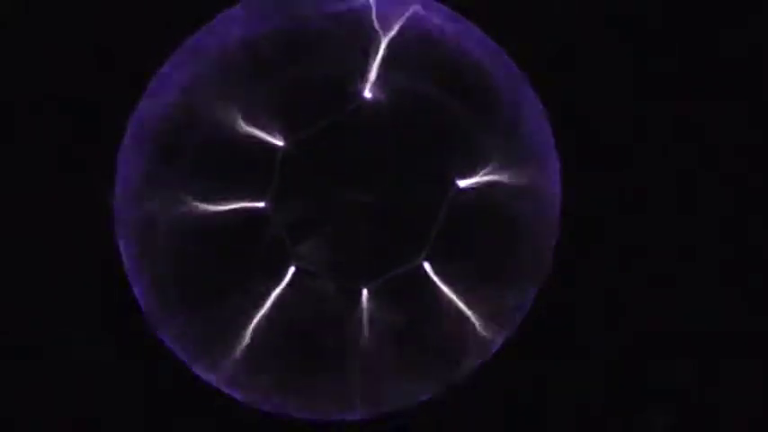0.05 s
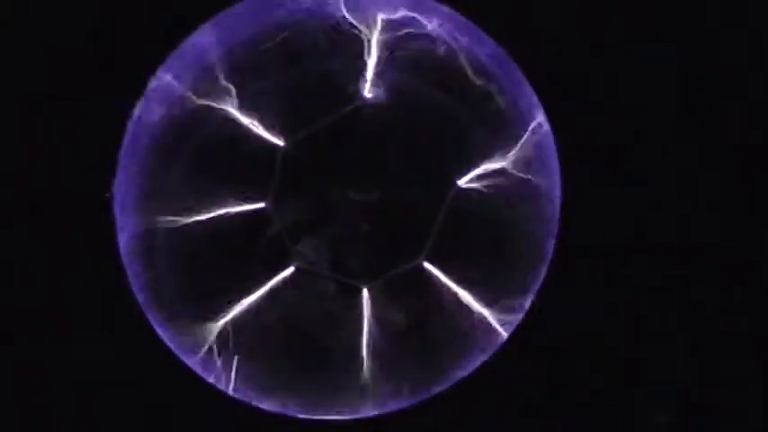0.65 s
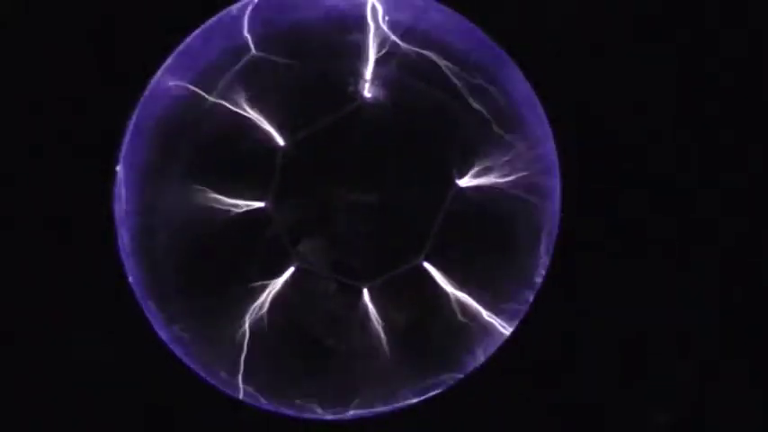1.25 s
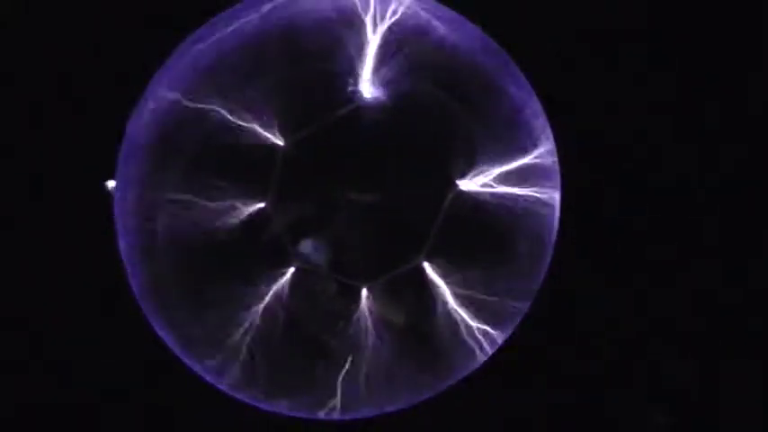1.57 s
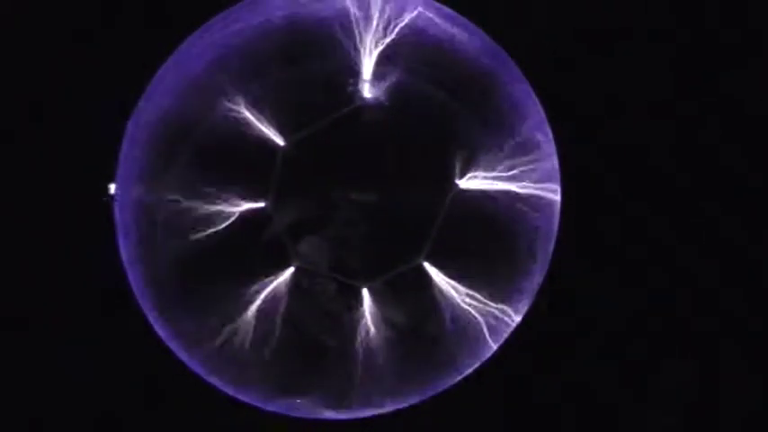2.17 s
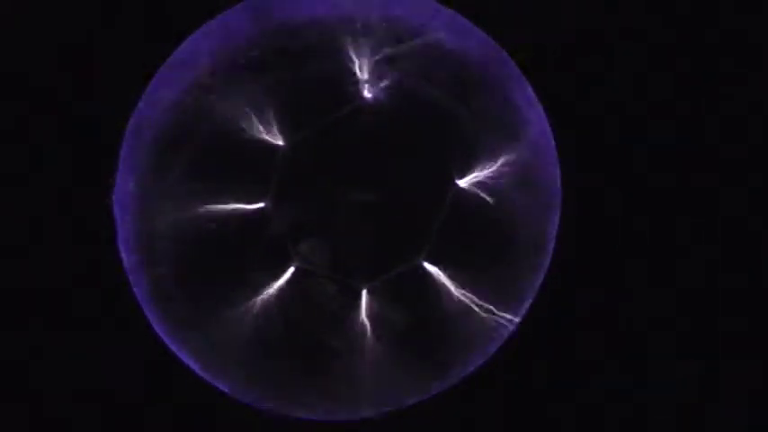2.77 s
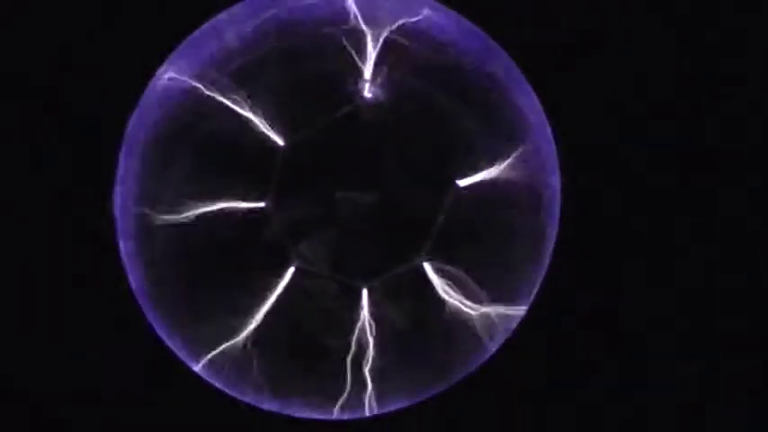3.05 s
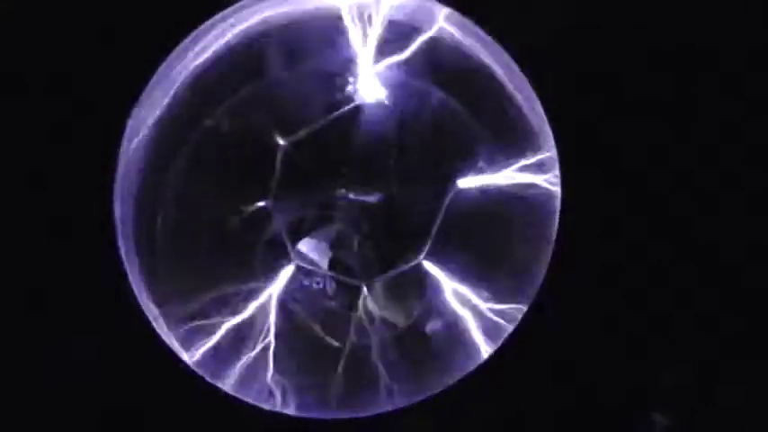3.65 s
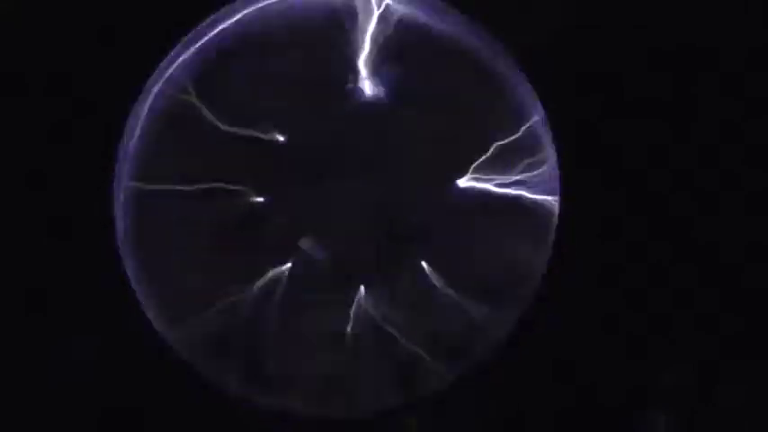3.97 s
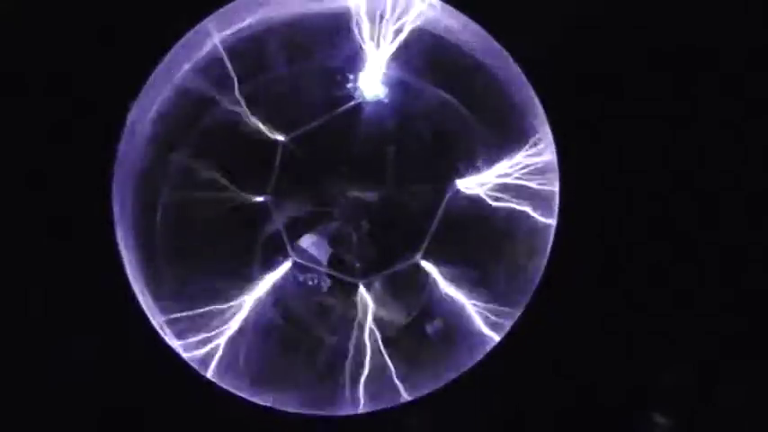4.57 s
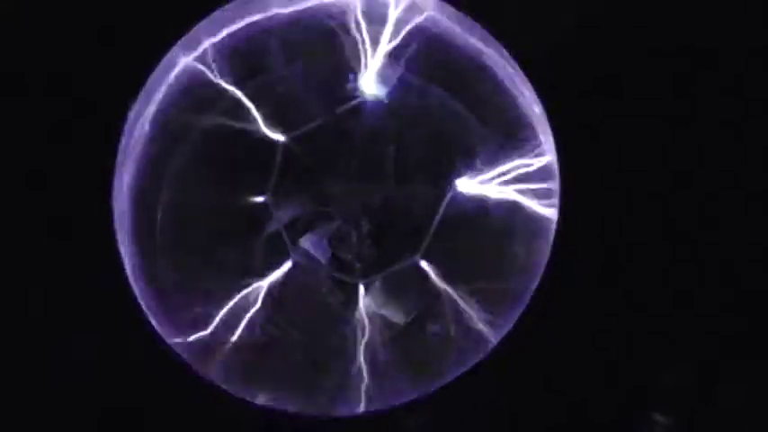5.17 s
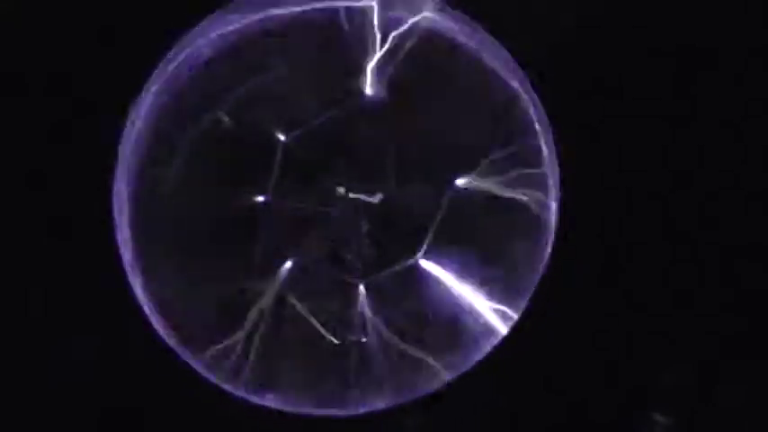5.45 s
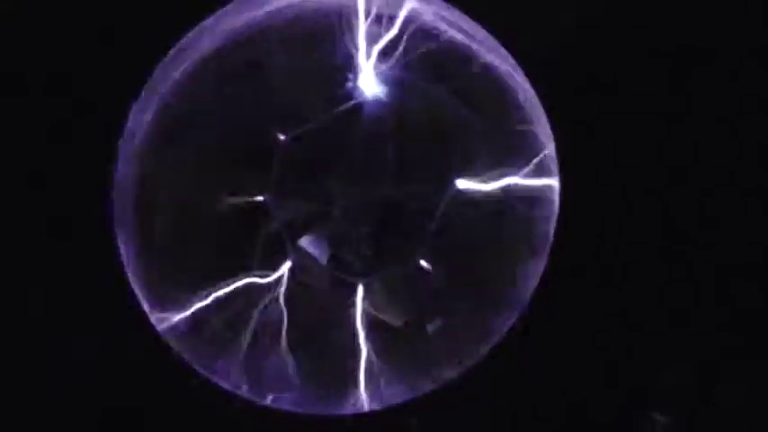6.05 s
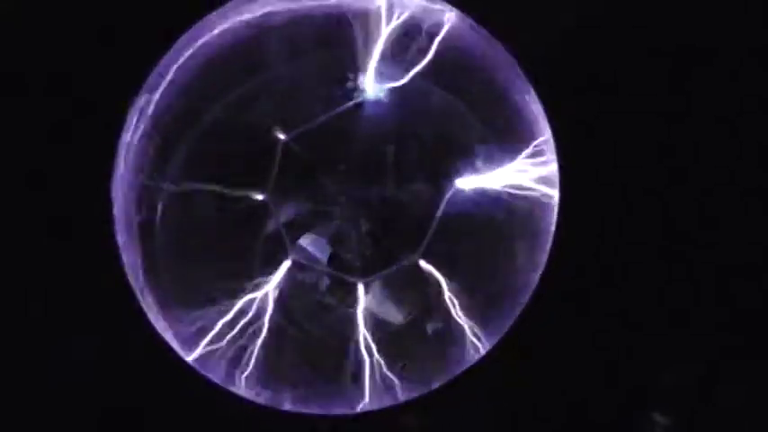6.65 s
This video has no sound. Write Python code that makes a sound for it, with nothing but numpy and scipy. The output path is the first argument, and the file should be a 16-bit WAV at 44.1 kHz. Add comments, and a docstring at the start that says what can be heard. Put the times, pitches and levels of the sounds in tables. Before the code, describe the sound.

Dense, buzzing crackle of high-voltage sparks inside a glass light bulb, with bright sizzling and irregular sharper snaps.

```python
"""High-voltage sparks in a light bulb

Once per mains cycle the gas breaks down in a volley of snaps; heavy arcs also thud on the glass.
Ordinary sparks vary with the charge left for them. Tiny discharges sizzle after each.
Halfway through, the arcs grow hot at one support wire and the bulb's ringing swells.
Behind it: the echoes of a small workroom, transformer hum, quiet air."""
import sys
import numpy as np
from scipy import signal
from scipy.fft import rfft, irfft, next_fast_len
from scipy.io import wavfile
from scipy.ndimage import uniform_filter1d

SR = 44100
rng = np.random.default_rng(int(sys.argv[2]) if len(sys.argv) > 2 else 0)


def bounce(signal):
    """Save signal as a 16-bit WAV file at the path given by the first command-line argument."""
    frames = np.transpose(np.atleast_2d(signal))
    limited = np.clip(frames, -1, 1)
    pcm = np.round(limited * 32767).astype(np.int16)
    wavfile.write(sys.argv[1], SR, pcm)


N = 299875
MAINS_HZ, FIRST_CREST_S = 49.94, 0.0154

# Heavy arcs. Each row: start in seconds, then crack, thud and sizzle in relative dB.
HEAVY_ARCS = [(0.0355, -17.5, -28.5, -37), (0.1562, -18.5, -36, -30), (0.195, -18.0, -36.5, -26.5),
              (0.236, -19, -39, -40), (0.336, -16.5, -41, -29), (0.3956, -21.5, -38.5, -34),
              (0.4753, -16, -32.5, -35), (0.5173, -19.5, -34, -37), (0.6571, -19, -38.5, -35),
              (0.677, -19, -42, -32), (0.7352, -20.5, -36, -30.5), (0.7556, -18.5, -42.5, -35),
              (0.9167, -17.0, -37.5, -32), (1.0167, -19, -70, -28.5), (1.0766, -19.5, -50, -34),
              (1.0966, -20.0, -33, -41), (1.157, -21.5, -38.5, -35), (1.1972, -18.5, -35.5, -33),
              (1.3176, -18, -35.5, -29), (1.3572, -21, -42, -30.5), (1.3985, -22.5, -40, -34),
              (1.418, -21, -30.5, -52), (1.5574, -20, -37.5, -31), (1.5975, -19, -40, -36),
              (1.678, -18.5, -40.5, -26.5), (1.7176, -15.5, -34.5, -39), (1.8184, -18.5, -42, -32),
              (1.858, -17.5, -39, -34), (1.9779, -19, -34.5, -46), (2.1168, -18.5, -43.5, -29),
              (2.1389, -21.0, -40.5, -30), (2.2199, -18.5, -41, -35), (2.2388, -20, -42.5, -39),
              (2.3, -23, -42, -43), (2.3798, -21, -44, -41), (2.4774, -17.5, -39, -32),
              (2.4984, -20.5, -38.5, -39), (2.6196, -20.0, -36, -38), (2.6585, -19.5, -41, -32),
              (2.718, -21.5, -46, -34), (2.7789, -18.5, -35, -36), (2.8589, -19, -40, -33),
              (2.8982, -20.0, -37, -31), (2.9599, -19.5, -40.5, -31), (3.0191, -22, -40.5, -38),
              (3.0589, -22, -41.5, -34.5), (3.1796, -19, -31, -39), (3.3395, -19.5, -36, -32),
              (3.5183, -18.5, -38, -34), (3.539, -19.5, -36, -42), (3.6403, -18.5, -43.5, -32.5),
              (3.6992, -22.5, -52, -27.5), (3.74, -20.5, -38, -51), (3.7998, -19.5, -40.5, -34),
              (3.8415, -17, -36.5, -29), (3.9, -20.5, -43.5, -35), (3.9196, -19, -36.5, -37),
              (3.96, -19.0, -39.5, -33), (4, -22.5, -45, -37), (4.059, -23, -56, -32),
              (4.0798, -21, -40.5, -38), (4.121, -16.5, -39, -30.5), (4.1602, -21, -33.5, -35),
              (4.2205, -18.5, -32.5, -40), (4.2607, -17.5, -43, -35), (4.361, -19.5, -42, -35),
              (4.4401, -18.5, -29.5, -36), (4.5405, -20, -42.5, -37), (4.5803, -16.5, -35, -43),
              (4.7222, -19.5, -38.5, -36), (4.7812, -17.0, -43, -29.5), (4.9802, -19.5, -36, -39),
              (5.0612, -15.5, -39, -36), (5.0802, -20.0, -34.5, -42), (5.141, -19.5, -46, -39),
              (5.1814, -18.5, -38, -36.5), (5.3016, -18, -39, -35), (5.343, -20.5, -38.5, -34.5),
              (5.461, -20.5, -34.5, -34), (5.5614, -19.5, -32.5, -32), (5.6426, -22.0, -38, -49),
              (5.6622, -18.0, -38, -31), (5.7204, -20.0, -31.5, -34), (5.8428, -18.5, -38.5, -35),
              (5.9015, -20.5, -38.5, -32.5), (5.9809, -19, -36.5, -38), (6.0409, -21, -39, -36),
              (6.1205, -18.5, -31, -29.5), (6.143, -17.5, -33.5, -34.5), (6.203, -18, -39, -32),
              (6.2603, -19, -37.5, -31.5), (6.3424, -19, -34.5, -34), (6.4622, -20.5, -33, -31),
              (6.4823, -22.5, -39, -40), (6.5404, -23.5, -50, -30), (6.562, -19.5, -39.5, -39),
              (6.6439, -18.5, -38.5, -36), (6.7043, -18.5, -37, -40), (6.7449, -19.5, -38, -29)]
# Crests where the gas barely breaks down. Each entry: time in seconds.
LULLS_S = [0.12, 0.44, 1.58, 1.84, 2.1, 2.46, 2.7, 2.76, 3.16, 3.26, 3.38, 3.5, 3.62, 4.04, 4.1, 4.24, 4.86,
           5.24, 5.5, 5.62, 6.02, 6.1, 6.3]
# Charge for ordinary sparks. Each row: time in seconds, offset in dB.
CHARGE_DB = [(0, -2), (.7, 0), (1.65, -2.5), (2.05, 3.5), (2.55, 0), (3, -1), (3.3, -0.5), (3.8, -0.7),
             (4.6, -0.9), (5.7, 0.8), (6.3, 1), (6.8, -3.5)]
# Arc heat at the support wire. Each row: time in seconds, heat from 0 to 1.
ARC_HEAT = [(0, 0.33), (2.95, 0.09), (3.3, 0.43), (3.55, 0.82), (5, 1), (6.8, 0.9)]
# Source spectra. Each row: frequency in Hz, relative density in dB.
CRACK_SPECTRUM = [(1200, -51), (2400, -23), (3300, -17), (4500, -10), (5800, -12.5), (7600, -9.5),
                  (9000, -3.5), (10100, -1.5), (11600, 3), (13000, 0.5), (14200, -3), (15600, -6),
                  (16100, -13)]
KNOCK_SPECTRUM = [(100, -33), (500, -5.5), (950, -1.5), (1400, 1.5), (2000, -2.5), (2400, -10), (4000, -29)]
THUD_SPECTRUM = [(15, 4), (50, 0), (150, -0.5), (400, 0.5), (800, 1), (1200, -2.5), (1700, -12),
                 (2100, -11.5), (2450, -26.5), (4000, -56)]
SIZZLE_SPECTRUM = [(60, -14.5), (400, -9), (1000, -10.5), (1900, -5), (2450, -17), (3300, -11),
                   (4600, -4.5), (7500, -5), (9000, -2.5), (11600, -1.5), (13500, 4), (15600, -5),
                   (16100, -12)]
AIR_SPECTRUM = [(20, -17), (60, -19), (150, -12), (400, 6.5), (1500, -1), (5000, -0.5), (15000, -52)]
# Broad resonances of the glass. Each row: centre in Hz, width in Hz, lift in dB.
GLASS_RESONANCES = [(4900, 270, 0.5), (6400, 360, 2.5), (8240, 65, 7), (9110, 530, 6.5), (9220, 96, -12),
                    (11070, 300, 2), (13000, 930, -1), (12800, 350, 0.5), (15300, 340, -0.5),
                    (15760, 690, 7.5)]
# Sharp modes of bulb and wires. Each row: frequency in Hz, gain in dB at full heat.
BULB_MODES = [(1513, -66), (2056, -60.5), (3268, -58.5), (4673, -66), (6196, -65), (6616, -52), (7671, -53),
              (9025, -54), (9249, -54), (9609, -53), (10494, -44), (10799, -44), (11795, -47),
              (12096, -42.5), (13135, -52), (13291, -52), (13657, -51), (14314, -59), (15176, -54),
              (15628, -45)]
# Stereo balance of direct sound. Each row: frequency in Hz, left over right in dB.
BALANCE_DB = [(100, 1), (5000, -0.5), (7600, 0.3), (9500, -2.6), (11400, -4.6), (12300, -6.5), (13300, 11),
              (14800, -8), (16000, 6)]
# Stereo phase of direct sound. Each row: frequency in Hz, left lead in radians.
LEFT_LEAD_RAD = [(100, -0.13), (7500, -0.25), (8500, -0.9), (10200, 0.14), (12000, 0.65), (13300, 1),
                 (14600, 0.046), (16000, 0.19)]
# Stereo width of sizzle, reverb and room air: wide in the bass and top treble, centred in the mids.
# Each row: frequency in Hz, left-right coherence from 0 to 1.
STEREO_COHERENCE = [(50, 0.53), (250, 0.56), (600, 0.88), (1200, 0.91), (2400, 1), (5000, 0.98),
                    (9000, 0.82), (14000, 0.35)]
# Echoes off nearby surfaces. Each row: delay in seconds, gain in dB.
SLAP_ECHOES = [(.0072, -21.5), (0.0124, -18.5)]
# Room decay. Each row: frequency in Hz, T60 in seconds.
ROOM_T60_S = [(60, 0.072), (250, 0.04), (1000, 0.11), (3000, 0.11), (8000, 0.13), (15000, 0.094)]


def breakdowns(jitter_s=0.0009, cold_short_db=2.5, hot_short_db=5, max_short_db=13.5, held_db=0.5):
    """One spark per mains cycle, in rows like HEAVY_ARCS. A hot arc fires less evenly."""
    # Each tuple: crack, thud, sizzle.
    full_db, cap_db, lull_db = (-21.5, -47, -35), (-21, -44, -31), (-43, -69, -44)
    db_per_charge_db, spread_db = (0.89, 1.37, 0.52), (1, 4, 1.53)
    arcs = np.array(HEAVY_ARCS)
    crests_s = np.arange(FIRST_CREST_S, N / SR, 1 / MAINS_HZ)
    heavy = abs(crests_s[:, None] - arcs[:, 0]).min(1) < 0.5 / MAINS_HZ
    lull = abs(crests_s[:, None] - np.array(LULLS_S)).min(1) < 0.5 / MAINS_HZ
    chance = rng.standard_normal((len(crests_s), 4))
    mean_short_db = cold_short_db + (hot_short_db - cold_short_db) * heat(crests_s)
    shortfall_db = np.minimum(mean_short_db * rng.exponential(1, len(crests_s)), max_short_db)
    charge_db = np.interp(crests_s, *np.transpose(CHARGE_DB)) - shortfall_db
    charge_db -= held_db * np.roll(heavy, -1)  # held back just before a heavy arc
    levels_db = np.array(full_db) + np.outer(charge_db, db_per_charge_db) + chance[:, 1:] * spread_db
    levels_db = np.where(lull[:, None], lull_db, np.minimum(levels_db, cap_db))
    ordinary = np.column_stack([crests_s + jitter_s * chance[:, 0], levels_db])
    return np.vstack([arcs, ordinary[~heavy]])


def volleys(sparks, snap_s=0.00017, fizz_s=0.0023, pulse_s=0.00005,
            leader_db=-8, restrike_db=-6.5, fizz_db=-19, full_arc_db=-50):
    """Leader, main stroke and restrike, about 1 ms apart, in a fizz of small streamers."""
    t = np.arange(-180, 220) / SR
    fizz = amp(fizz_db) * np.exp(-abs(t) / fizz_s)
    cracks, knocks, thuds = np.zeros((3, 2, N))
    for spark_s, crack_db, thud_db, _ in sparks:
        start_s = spark_s + t[0]
        leader_shift, restrike_shift, leader_size, restrike_size, side = rng.standard_normal(5)
        strokes_s = np.array([-0.00085 + 0.00027 * leader_shift, 0, 0.00102 + 0.0001 * restrike_shift])
        age_s = np.maximum(t - strokes_s[:, None], 0)
        begun = t >= strokes_s[:, None]
        # Light sparks are nearly single snaps, heavy ones a full volley.
        weight_db = thud_db - np.mean(sparks[:, 2])
        sizes = amp([leader_db + 3 * leader_size + 0.18 * weight_db, 0,
                     restrike_db + 3 * restrike_size + 0.18 * weight_db])
        burst = sizes @ (begun * np.exp(-age_s / snap_s)) + fizz
        for channel in cracks:
            add(channel, start_s, amp(crack_db) * unit_rms(burst * rng.choice([-1, 1], len(t))))
        # Each stroke heats the gas: a one-sided pressure pulse knocks on the glass.
        pulses = begun * np.exp(-age_s / pulse_s)
        pulses /= pulses.sum(1, keepdims=True)
        grit = 0.14 * burst * rng.standard_normal(len(t))
        knock = -amp(crack_db + 0.21 * weight_db) * (sizes @ pulses + grit)
        add_panned(knocks, start_s, knock, 0.29 * side)
        # Only a full arc thuds; a strong restrike makes it a hollow pop.
        push = amp(thud_db) / (1 + amp(full_arc_db - thud_db) ** 2)
        rebound = amp(min(-13 + 6 * restrike_size, 0))
        thud = -push * (pulses[1] + rebound * pulses[2]) / np.hypot(1, rebound)
        add_panned(thuds, start_s, thud, 0.51 * side)
    return cracks, knocks, thuds


def sizzle(sparks, rise_s=0.0021, decay_s=0.015, grain_db=2):
    """Tiny discharges creep over the glass and die away after each spark."""
    t = np.arange(SR // 10) / SR
    envelope = (1 - np.exp(-t / rise_s)) * np.exp(-t / decay_s)
    power = np.zeros(N)
    for start_s, _, _, sizzle_db in sparks:
        add(power, start_s, (amp(sizzle_db) * envelope) ** 2)
    grains = unit_rms(amp(grain_db * smooth_noise(span_samples=24)))
    return stereo_noise(N) * np.sqrt(power) * grains


def heat(times_s=np.arange(N) / SR):
    """Arc heat, 0 to 1; per sample by default."""
    return np.interp(times_s, *np.transpose(ARC_HEAT))


def heat_shelf(x, cold_db, hot_db, corner_hz=13000):
    """Top treble gain follows the arc heat."""
    treble = signal.sosfiltfilt(signal.butter(2, corner_hz, "high", fs=SR, output="sos"), x)
    return x + treble * (amp(cold_db + (hot_db - cold_db) * heat()) - 1)


def bulb_ring(cracks, creep):
    """The hot arc strikes the bulb's modes and sizzle sustains them. Higher modes die sooner."""
    t = np.arange(SR // 6) / SR
    drive = stereo(unit_rms(cracks), 1.0) + 2 * unit_rms(creep)
    response = 0
    for hz, gain_db in BULB_MODES:
        width_hz = 10 + 0.003 * hz
        mode = np.exp(-np.pi * width_hz * t) * np.sin(2 * np.pi * hz * t)
        response += amp(gain_db) * mode / np.linalg.norm(mode)
    return signal.oaconvolve(unit_rms(drive) * heat(), response[None], axes=1)[:, :N]


def direct_path(x):
    """Sound from the bulb arrives with left-right differences in level and phase."""
    size = next_fast_len(N + 2048)
    hz = np.fft.rfftfreq(size, 1 / SR)
    left = amp(at_hz(BALANCE_DB, hz) / 2) * np.exp(0.5j * at_hz(LEFT_LEAD_RAD, hz))
    return irfft(rfft(x, size) * np.array([left, 1 / left]), size)[:, :N]


def slaps(x):
    """Nearby hard surfaces throw each snap back."""
    return sum(amp(gain_db) * np.pad(x, ((0, 0), (round(delay_s * SR), 0)))[:, :N]
               for delay_s, gain_db in SLAP_ECHOES)


def reverb(x, predelay_s=0.0027):
    """Dense reflections off near walls; each band dies at its own rate."""
    hz, t, bands = signal.stft(stereo_noise(SR // 2), SR, nperseg=256)
    decay = amp(-60 * t / at_hz(ROOM_T60_S, hz)[:, None])
    tail = signal.istft(bands * decay, SR, nperseg=256)[1]
    tail *= np.arange(tail.shape[1]) > predelay_s * SR
    return signal.fftconvolve(x, tail / np.linalg.norm(tail[0]), axes=1)[:, :N]


def transformer_hum(level_db=-72, waver=0.5):
    """A wavering tone at the third mains harmonic."""
    swell = 1 + waver * smooth_noise(span_samples=3000)
    cycles = 3 * MAINS_HZ * np.arange(N) / SR + rng.random()
    return amp(level_db) * np.sqrt(2) * swell * np.sin(2 * np.pi * cycles)


def room_air(level_db=-66):
    """Quiet, steady room noise."""
    return amp(level_db) * colour(stereo_noise(N), AIR_SPECTRUM)


def amp(db):
    """Decibels to gain."""
    return 10 ** (np.asarray(db) / 20)


def unit_rms(x):
    """Scales to an rms of one."""
    return x / np.sqrt(np.mean(x ** 2) + 1e-20)


def at_hz(table, hz):
    """Interpolates on a log-frequency axis."""
    knots_hz, values = np.transpose(table)
    return np.interp(np.log(hz + 1), np.log(knots_hz + 1), values)


def add(mix, start_s, sound):
    """Mixes a sound into one channel."""
    part = mix[max(round(start_s * SR), 0):][:len(sound)]
    part += sound[:len(part)]


def add_panned(mix, start_s, sound, leftward):
    """Mixes a sound into both channels, off centre."""
    for channel, sign in zip(mix, (1, -1)):
        add(channel, start_s, sound * (1 + sign * np.tanh(leftward)))


def colour(x, spectrum, glass=False, size=4096):
    """Minimum-phase filter of unit energy; glass resonances optional."""
    hz = abs(np.fft.fftfreq(size, 1 / SR))
    gain_db = at_hz(spectrum, hz)
    if glass:
        for centre_hz, width_hz, lift_db in GLASS_RESONANCES:
            gain_db += lift_db / (1 + (2 * (hz - centre_hz) / width_hz) ** 2)
    response = np.exp(signal.hilbert(np.log(amp(gain_db))).conj())
    taps = np.fft.ifft(response).real[:size // 2]
    return signal.oaconvolve(x, taps[None] / np.linalg.norm(taps), axes=1)[:, :N]


def stereo(two, coherence):
    """Two unrelated signals to left and right. Coherence: a number or a table by frequency."""
    size = two.shape[1]
    padded = next_fast_len(size)
    if not np.isscalar(coherence):
        coherence = at_hz(coherence, np.fft.rfftfreq(padded, 1 / SR))
    spectra = rfft(two, padded)
    mid = np.sqrt((1 + coherence) / 2) * spectra[0]
    side = np.sqrt((1 - coherence) / 2) * spectra[1]
    return irfft(np.array([mid + side, mid - side]), padded)[:, :size]


def stereo_noise(samples):
    """White noise, partly alike left and right."""
    return stereo(rng.standard_normal((2, samples)), STEREO_COHERENCE)


def smooth_noise(span_samples):
    """Moving average of noise, unit rms."""
    return unit_rms(uniform_filter1d(rng.standard_normal(N), size=span_samples))


def scene():
    """Cracks, knocks and thuds with their sizzle and ring, in the room."""
    sparks = breakdowns()
    cracks, knocks, thuds = volleys(sparks)
    snaps = colour(stereo(cracks, 0.98), CRACK_SPECTRUM, glass=True)
    snaps = amp(-6) * heat_shelf(snaps, cold_db=-2, hot_db=-4.5)
    body = amp(0.63) * colour(knocks, KNOCK_SPECTRUM) + amp(24) * colour(thuds, THUD_SPECTRUM)
    hiss = colour(sizzle(sparks), SIZZLE_SPECTRUM, glass=True)
    hiss = amp(-1 - 3 * heat()) * heat_shelf(hiss, cold_db=-4, hot_db=12)
    echoes = reverb(amp(-12.5) * snaps + amp(-16) * body + amp(-8.5) * hiss)
    ring = bulb_ring(cracks, sizzle(sparks))
    return direct_path(snaps + slaps(snaps) + body) + hiss + ring + echoes + transformer_hum() + room_air()


def record(dry, ceiling=0.63, highpass_hz=12, lowpass_hz=15900):
    """Soft clip, DC block, band limit."""
    rounded = ceiling * np.tanh(dry / ceiling)
    blocked = signal.sosfilt(signal.butter(1, highpass_hz, "high", fs=SR, output="sos"), rounded)
    taps = signal.firwin(255, lowpass_hz, window=("kaiser", 9), fs=SR)
    return signal.oaconvolve(blocked, taps[None], "same")


dry = scene()
out = record(dry)
bounce(out)
```